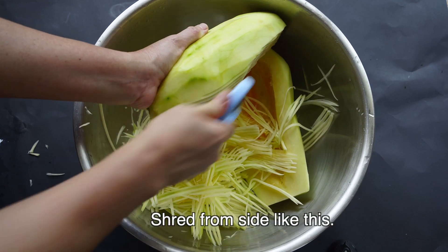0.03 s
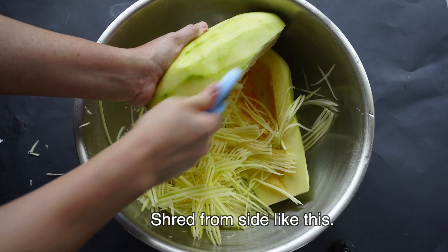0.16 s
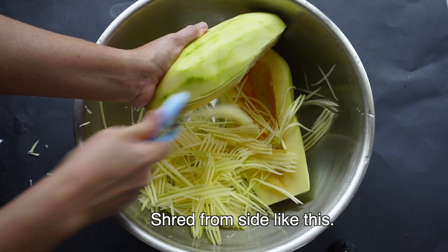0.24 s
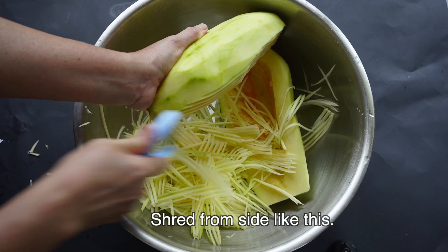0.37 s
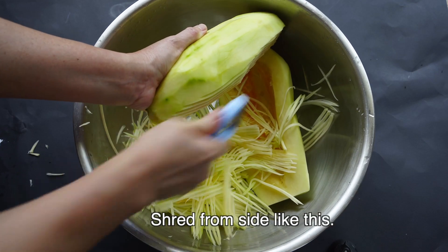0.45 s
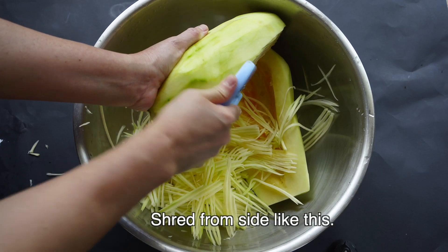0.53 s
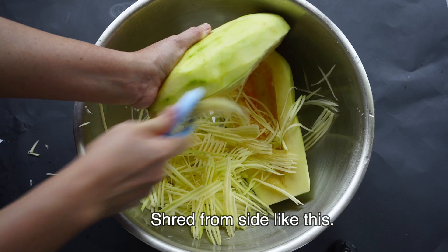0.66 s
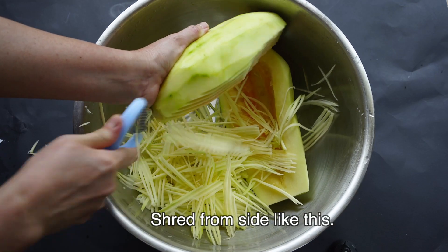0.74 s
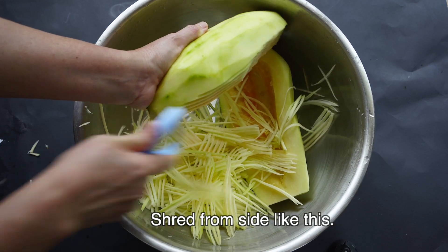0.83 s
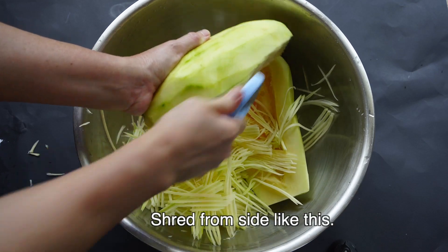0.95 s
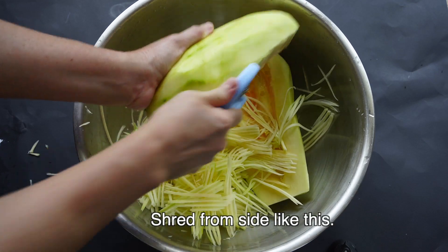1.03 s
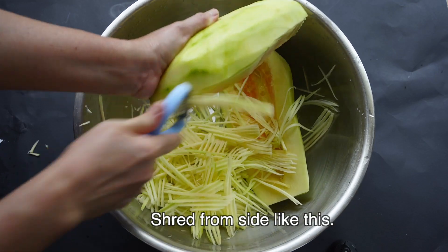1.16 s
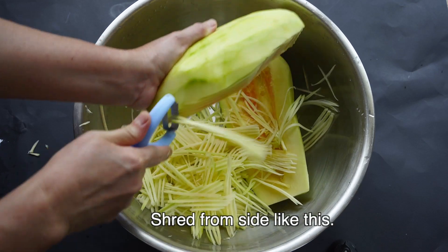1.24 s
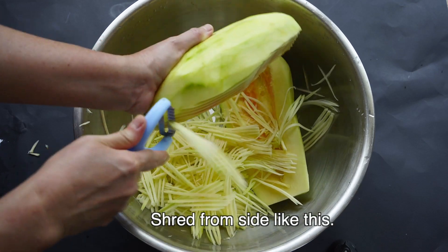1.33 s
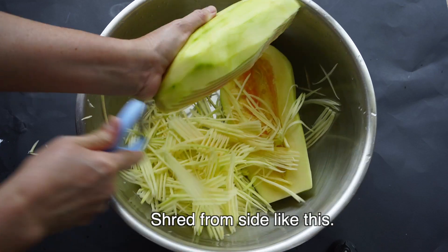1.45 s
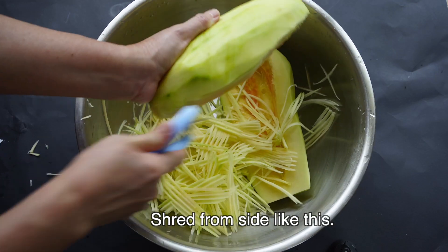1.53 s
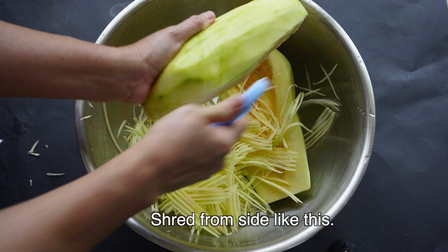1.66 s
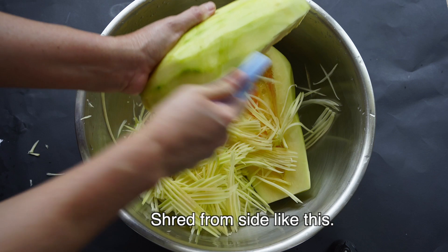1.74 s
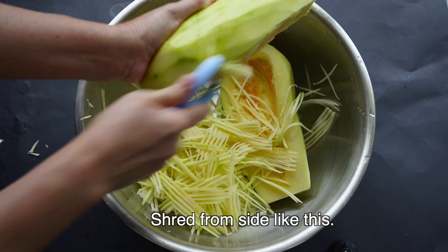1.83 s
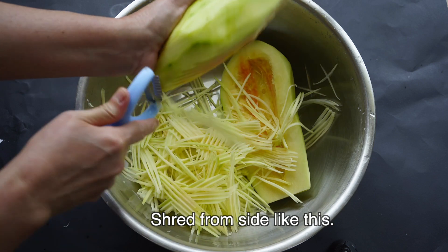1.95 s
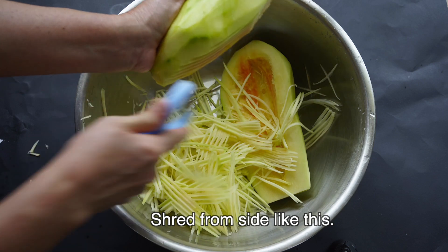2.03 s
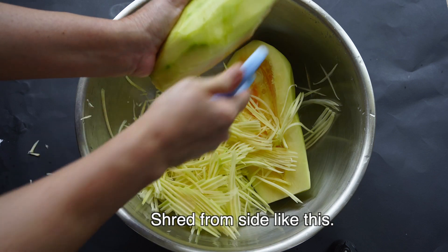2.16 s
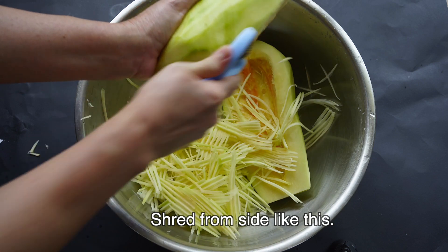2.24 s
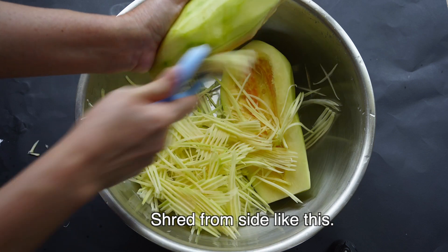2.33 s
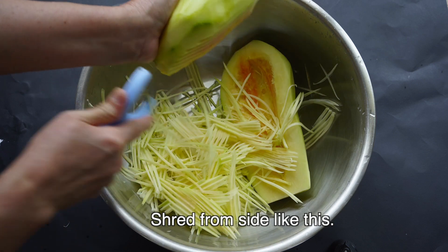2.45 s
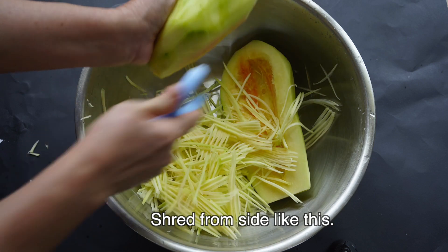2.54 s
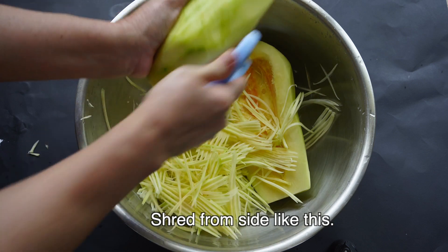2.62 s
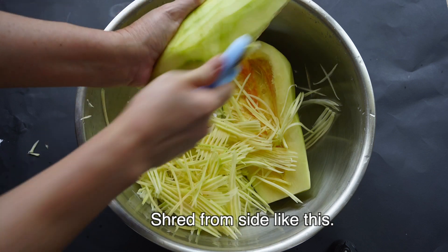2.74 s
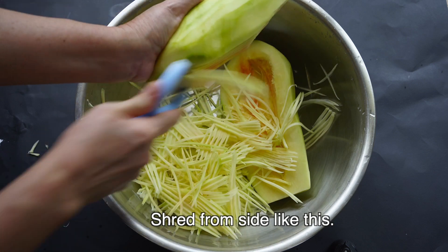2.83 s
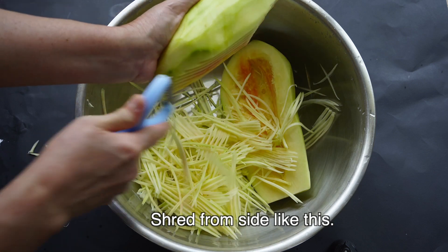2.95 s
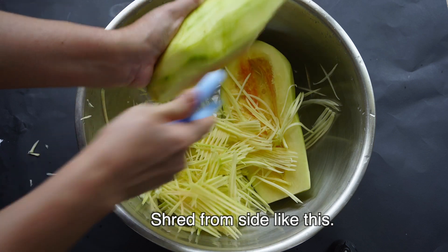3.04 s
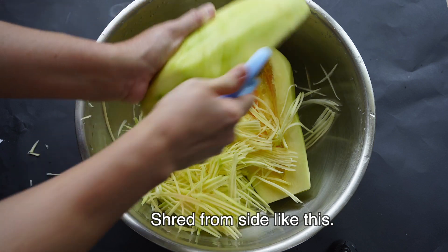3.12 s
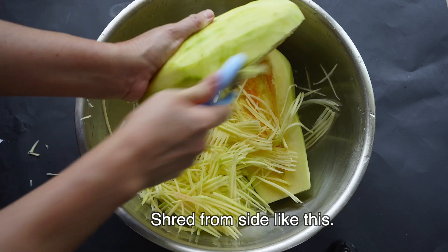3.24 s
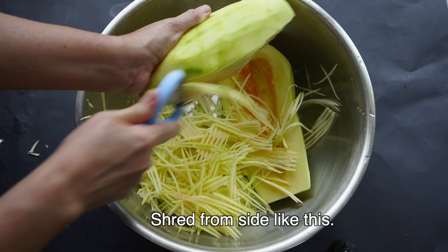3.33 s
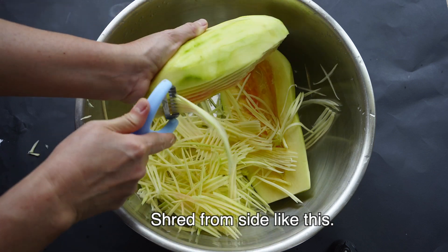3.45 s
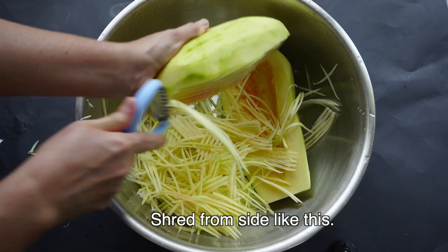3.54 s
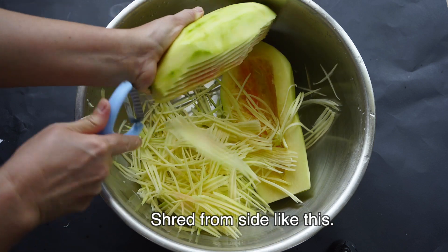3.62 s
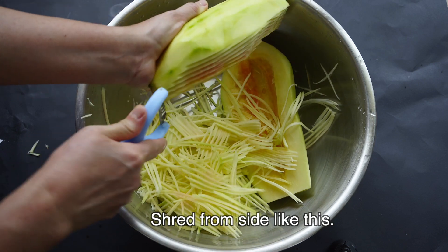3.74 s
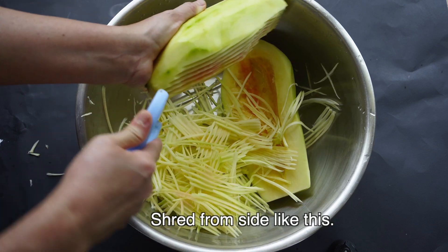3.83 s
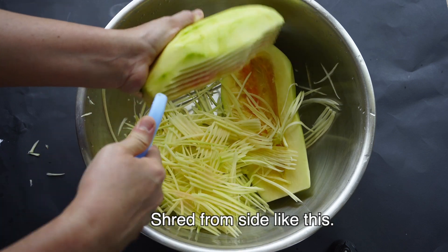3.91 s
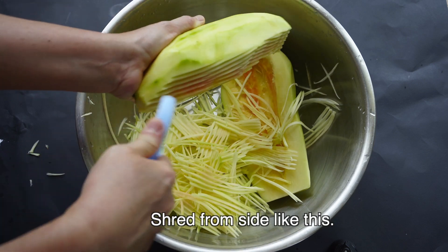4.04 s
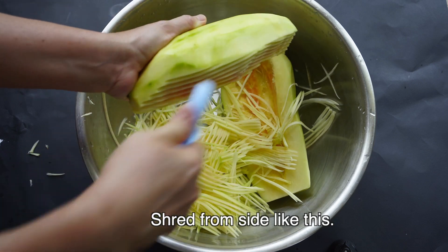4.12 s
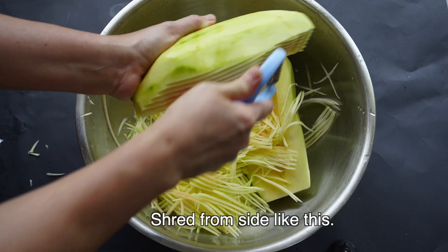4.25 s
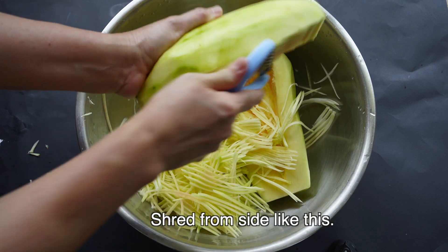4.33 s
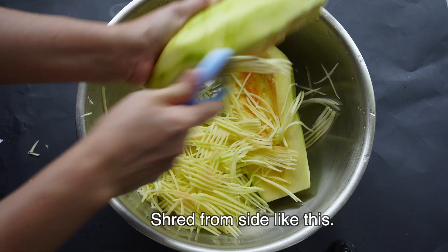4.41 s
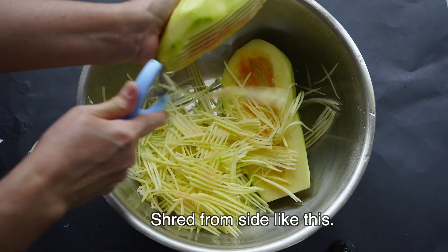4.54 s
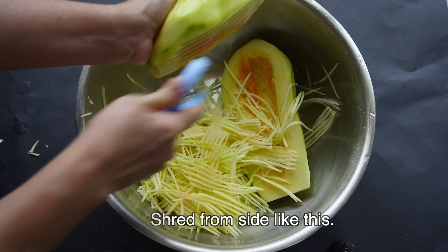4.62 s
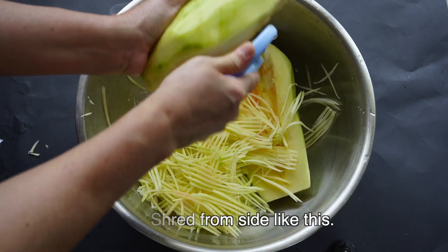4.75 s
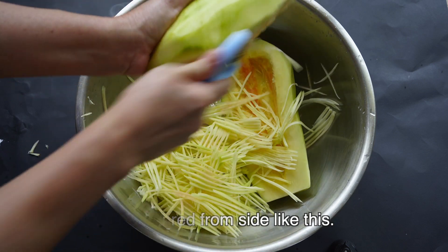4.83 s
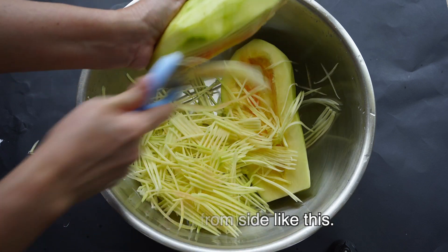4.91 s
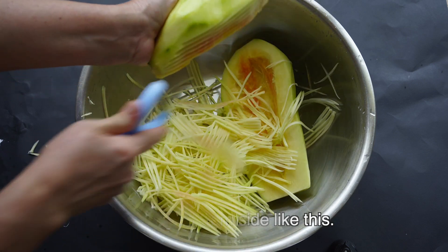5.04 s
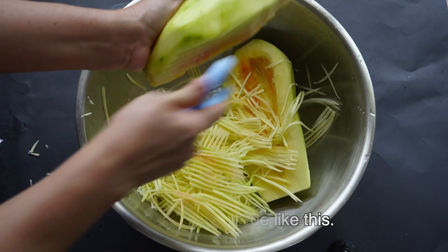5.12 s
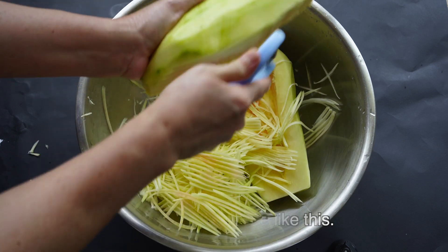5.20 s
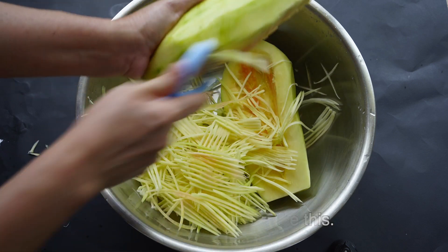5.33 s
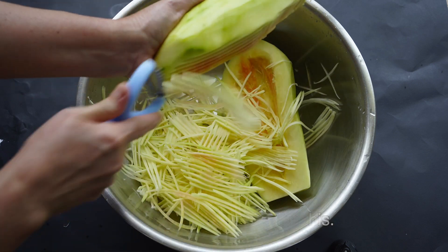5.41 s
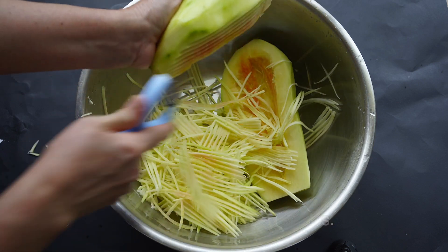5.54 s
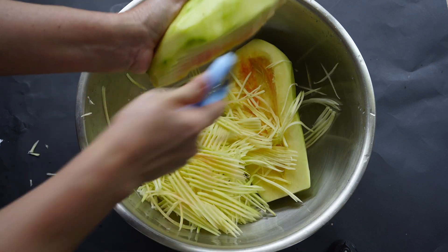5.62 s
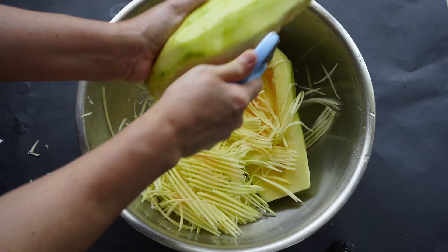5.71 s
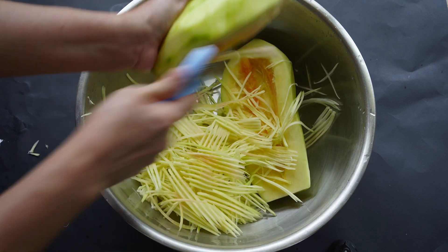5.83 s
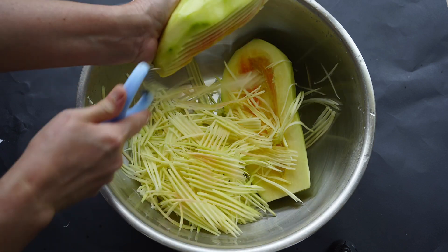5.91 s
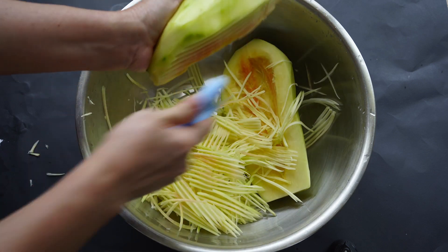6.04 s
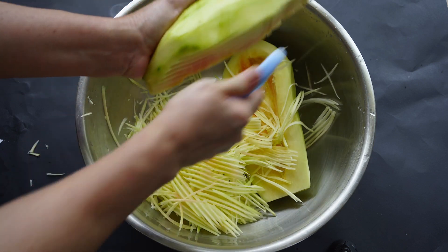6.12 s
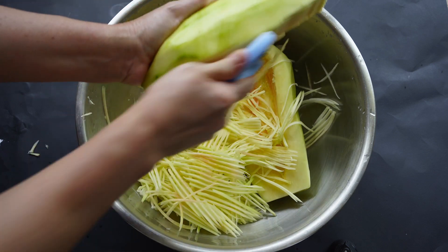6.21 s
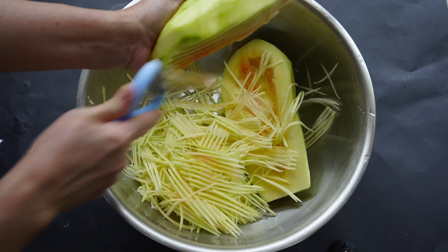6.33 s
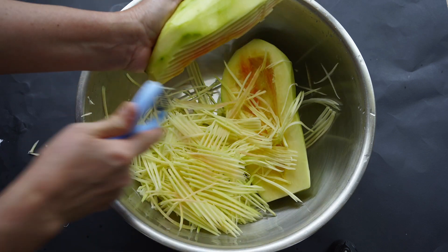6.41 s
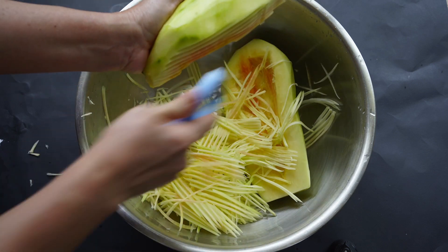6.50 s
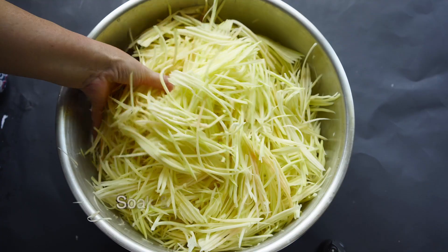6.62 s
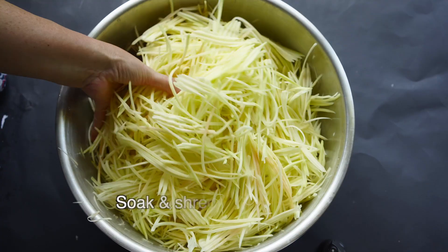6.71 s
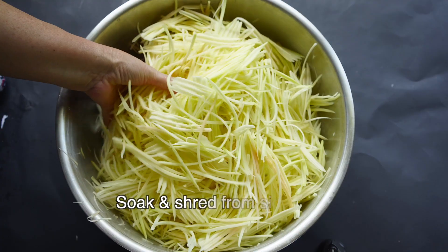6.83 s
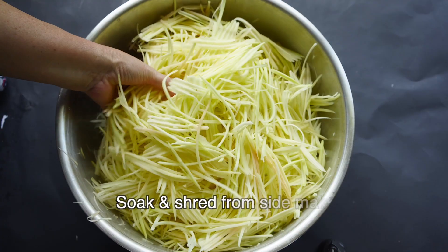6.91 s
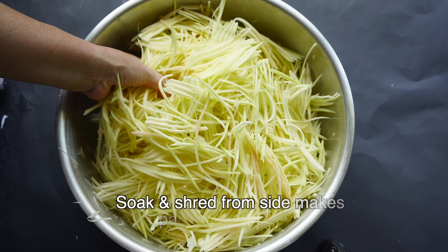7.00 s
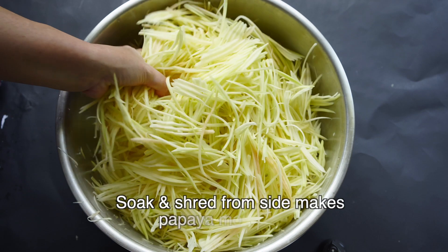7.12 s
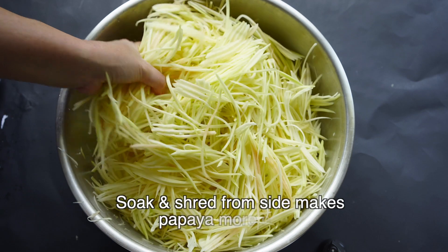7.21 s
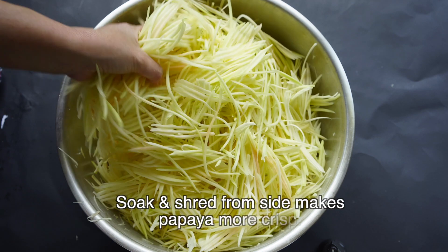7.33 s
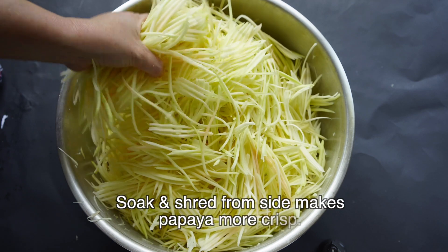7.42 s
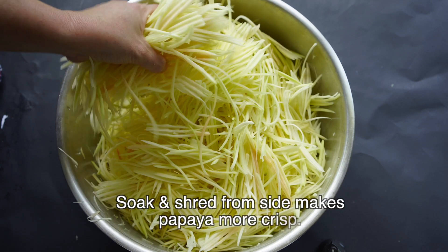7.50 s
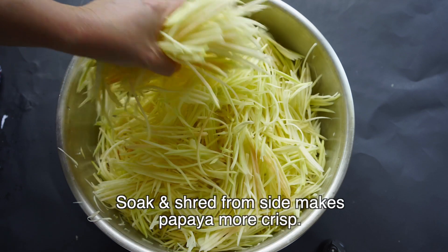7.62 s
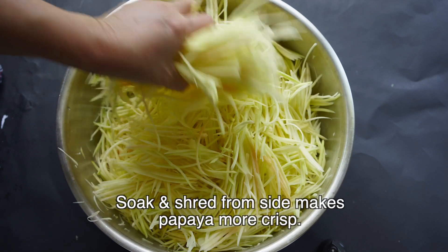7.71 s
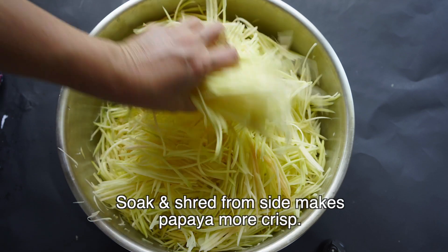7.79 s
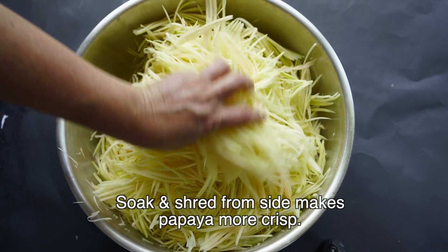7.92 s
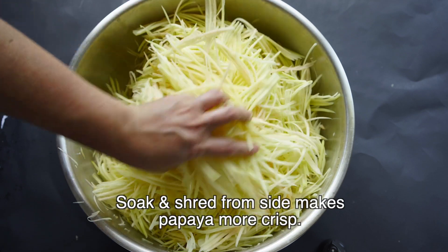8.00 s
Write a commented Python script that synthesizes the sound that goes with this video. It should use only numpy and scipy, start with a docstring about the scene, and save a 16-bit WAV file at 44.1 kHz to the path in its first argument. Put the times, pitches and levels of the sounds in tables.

```python
"""A hand shredder is pulled again and again down a firm green fruit over a steel bowl in a quiet kitchen.
Each stroke opens with a sharp bite of the teeth, then rasps: bursting cells click densely and ring the
blade frame. Between strokes the tool brushes, the loose blade ticks and the fruit bumps the bowl.
At the end a hand turns the wet shreds over and nails clink on the steel. The room hums softly."""
import sys
import numpy as np
from scipy import signal
from scipy.fft import rfft, irfft
from scipy.io import wavfile

SR = 44100
rng = np.random.default_rng(int(sys.argv[2]) if len(sys.argv) > 2 else 0)


def store_pcm(level_fs):
    """Save levels as 16-bit WAV."""
    pcm = np.round(np.clip(level_fs, -1, 1) * 32767).astype(np.int16)
    wavfile.write(sys.argv[1], SR, np.atleast_2d(pcm).T)


N = 355446


def from_db(db):
    """Decibels to gain."""
    return 10 ** (np.asarray(db) / 20)


def unit_rms(x):
    """Scale to rms 1."""
    return x / np.sqrt(np.mean(x ** 2) + 1e-20)


def drift(rate_hz):
    """Slow random wander, rms 1."""
    r = np.exp(-2 * np.pi * rate_hz / SR)
    return unit_rms(signal.lfilter([1], [1, -2 * r, r * r], rng.standard_normal(N)))


def clicks(per_s, spread_db):
    """Two streams of random clicks of uneven size, rms 1."""
    sizes = from_db(spread_db * np.minimum(rng.exponential(1, (2, N)), 5))
    signs = rng.choice([-1, 1], (2, N))
    return unit_rms(sizes * signs * (rng.random((2, N)) < per_s / SR))


def resonate(x, hz, width_hz):
    """One resonance, peak gain 1."""
    r, w = np.exp(-np.pi * width_hz / SR), 2 * np.pi * hz / SR
    return signal.lfilter([(1 - r * r) / 2, 0, (r * r - 1) / 2], [1, -2 * r * np.cos(w), r * r], x)


def ring(force, hz, t60_s):
    """One mode driven by a short force, peak 1."""
    r, w = from_db(-60 / (t60_s * SR)), 2 * np.pi * hz / SR
    sound = signal.lfilter([1, 0, -1], [1, -2 * r * np.cos(w), r * r], force + 1e-18)
    return sound / np.abs(sound).max()


def struck(starts_s, levels_db, contacts_s, modes):
    """Short rough contacts ring each mode (Hz, dB, T60 s) with a slightly random strength."""
    length = SR // 2
    decay = np.exp(-np.arange(length) / SR / np.clip(contacts_s, .0003, .03)[:, None])
    forces = rng.standard_normal((len(starts_s), length)) * decay
    scatter_db = 0.8 * rng.standard_normal((len(starts_s), len(modes)))
    out = np.zeros(N + length)
    for start_s, db, force, offsets_db in zip(starts_s, levels_db, forces, scatter_db):
        blow = out[round(start_s * SR):][:length]
        for (hz, mode_db, t60_s), offset_db in zip(modes, offsets_db):
            blow += from_db(db + mode_db + offset_db) * ring(force, hz, t60_s)
    return out[:N]


def bursts(starts_s, levels_db, t60_s, rise_s):
    """Burst envelope: quick rise, exponential fall."""
    out = np.zeros(N)
    for start_s, db in zip(starts_s, levels_db):
        start = round(start_s * SR)
        t = np.arange(min(int(2 * t60_s * SR), N - start)) / SR
        out[start:start + len(t)] += from_db(db - 60 * t / t60_s) * (1 - np.exp(-t / rise_s))
    return out


# Stereo image. Each row: frequency in Hz, left-right correlation.
CORRELATION = [(300, 1), (600, 0.84), (1200, 0.69), (2500, 0.5), (5000, 0.6), (12000, 0.32)]

def coloured(pair, spectrum):
    """Two unrelated signals become left and right with the given spectral shape, rms 1."""
    log_hz = np.log(np.maximum(np.fft.rfftfreq(N, 1 / SR), 10))

    def curve(rows):
        hz, values = np.transpose(rows)
        return np.interp(log_hz, np.log(hz), values)

    alike = np.clip(curve(CORRELATION), 0, 1)
    mid, side = rfft(pair) * from_db(curve(spectrum)) * np.sqrt([1 + alike, 1 - alike])
    return unit_rms(irfft(np.array([mid + side, mid - side]), N))


# Room air. Each row: frequency in Hz, relative density in dB.
AIR_SPECTRUM = [(18, -118), (30, -53), (108, -17.5), (220, -12.5), (258, 0), (286, -9.5), (424, -11),
                (551, -10), (628, -10), (775, -10), (907, -12), (2330, -20), (2870, -24.5), (15800, -31.5)]
# Room hum. Each row: centre in Hz, width in Hz, level in dB.
HUM_BANDS = [(250, 15, -73), (403, 90, -64.5), (610.3, 31, -65.5)]

def room_tone(air_db=-51):
    """Steady air noise and narrow noise bands that waver as a hum."""
    air = from_db(air_db) * coloured(rng.standard_normal((2, N)), AIR_SPECTRUM)
    white = rng.standard_normal(N)
    hum = sum(from_db(db) * unit_rms(resonate(resonate(white, hz, width_hz), hz, width_hz))
              for hz, width_hz, db in HUM_BANDS)
    return air + hum


def kitchen_echoes(x, t60_s=0.36, split_hz=600):
    """Dense echoes: shared in the bass, separate per side above, dying faster in the treble."""
    t = np.arange(int(.6 * SR)) / SR
    noise = rng.standard_normal((3, len(t))) * (t > .004)
    bass = signal.sosfilt(signal.butter(2, split_hz, fs=SR, output="sos"), noise[2])
    upper = signal.sosfilt(signal.butter(2, split_hz, "high", fs=SR, output="sos"), noise[:2])
    mids = signal.lfilter([.45], [1, -.55], upper)
    tail = (bass + mids) * from_db(-60 * t / t60_s)
    tail += (upper - mids) * from_db(-60 * t / (0.47 * t60_s))
    tail /= np.sqrt(np.sum(tail ** 2, axis=1, keepdims=True))
    return signal.fftconvolve(x, tail, axes=1)[:, :N]


# Hand turning the shreds. Each row: time in seconds, level in dB.
RUSTLE_ENVELOPE = [(6.55, -63), (6.584, -83), (6.61, -47.5), (6.626, -71), (6.712, -50), (6.838, -77),
                   (7.094, -51), (7.14, -62), (7.3, -66)]

def shred_rustle():
    """Wet shreds crackle sparsely under the hand."""
    times_s, db = np.transpose(RUSTLE_ENVELOPE)
    gain = np.interp(np.arange(N) / SR, times_s, from_db(db), left=0, right=0)
    spectrum_hz_db = [(1200, -11), (2500, -6), (5000, -3.5), (10000, -9.5), (15000, -14)]
    return gain * coloured(clicks(2500, spread_db=3.5), spectrum_hz_db)


# Fruit on bowl. Each row: start in seconds, level in dB, contact in seconds, steel ring offset in dB.
FRUIT_BUMPS = [(.719, -48, 0.011, -40), (1.209, -32, 0.022, -40), (1.289, -37.5, .013, -40),
               (1.493, -18.5, 0.017, -9.5), (1.575, -11, 0.0014, -23), (1.599, -25.5, 0.0029, -30),
               (3.692, -33.5, 0.035, -40), (3.821, -32.5, 0.022, -40), (3.843, -37.5, 0.0068, -40)]
# Modes of fruit and pile, and of the empty bowl. Each row: frequency in Hz, level in dB, T60 in seconds.
THUD_MODES = [(153, -9, 0.068), (207, -1, 0.056), (308, -3, 0.037), (438, 2.5, 0.031), (627, -3, 0.029),
              (860, -3, 0.025), (1304, -7.5, 0.018), (2090, -13, 0.023), (3430, -6, 0.009),
              (4550, -22, 0.012)]
EMPTY_BOWL_MODES = [(1653, -6, .4), (1701, 0, .42)]

def bowl_bumps():
    """Each bump thuds in fruit and pile and rings the steel."""
    start_s, db, contact_s, steel_db = np.transpose(FRUIT_BUMPS)
    thud = struck(start_s, db - 5.5, contact_s, THUD_MODES)
    steel = struck(start_s, db + steel_db, contact_s, EMPTY_BOWL_MODES)
    return thud + steel


# Nails on bowl. Each row: start in seconds, level in dB, contact in seconds, high ring offset in dB.
NAIL_CLINKS = [(7.639, -46, 0.0072, -8), (7.6515, -44, 0.0055, -10), (7.7516, -58, 0.0061, 23),
               (7.8246, -44, 0.0063, 11)]
# Filled bowl. Each row: frequency in Hz, level in dB, T60 in seconds.
FILLED_BOWL_MODES = [(1820, -5, .1), (1870, -7, .12), (2013, 0, .2), (2336, -2, .11), (2665, -3, .06),
                     (3000, -10, .06), (3510, -11, .05)]

def nail_clinks():
    """Nails ring the filled, damped bowl briefly."""
    start_s, db, contact_s, high_db = np.transpose(NAIL_CLINKS)
    low = struck(start_s, db - 3.5, contact_s, FILLED_BOWL_MODES)
    high = struck(start_s, db + high_db - 14, contact_s, [(4950, 0, .025)])
    return low + high


# Blade and shred ticks. Each row: start in seconds, peak in dB, centre in Hz.
BLADE_TICKS = [(0.0443, -35.5, 4670), (0.222, -23, 2110), (0.365, -24, 2100), (0.5076, -27.5, 2170),
               (0.826, -21.5, 2350), (0.8979, -30.5, 2760), (0.9427, -33, 2150), (0.9635, -35.5, 3670),
               (1.0136, -36, 2710), (1.468, -25, 4700), (1.7308, -38.5, 2710), (1.762, -41.5, 2940),
               (2.1537, -36, 3130), (2.5335, -24, 2570), (2.616, -27.5, 3250), (2.9948, -24.5, 2270),
               (3.091, -31.5, 2550), (3.1904, -40, 2920), (3.6607, -19, 2440), (3.7884, -20, 2920),
               (3.822, -19.5, 3650), (3.8392, -18, 6340), (3.8462, -21, 3450), (4.122, -27.5, 3230),
               (4.177, -37, 3570), (4.243, -34, 3400), (4.256, -35, 3300), (4.2672, -33.5, 3100),
               (4.355, -41, 2960), (4.5932, -20.5, 2940), (4.6023, -22, 2690), (4.8163, -32, 4370),
               (5.091, -26.5, 2600), (5.662, -35, 2100), (5.681, -37.5, 4370), (5.7933, -31, 2950),
               (5.9926, -24, 2770), (6.1387, -36.5, 5030), (6.6072, -37, 2020), (6.7052, -36, 4000),
               (6.766, -37, 2090), (6.99, -42, 8000), (7.0293, -34.5, 2980), (7.08, -38, 2500)]

def blade_ticks(t60_s=0.049, rise_s=0.00034):
    """The loose blade and snapping shreds tick: noise puffs through a broad resonance."""
    out, length = np.zeros((2, N)), int(0.036 * SR)
    t = np.arange(length) / SR
    envelope = from_db(-60 * t / t60_s) * (1 - np.exp(-t / rise_s))
    for start_s, peak_db, hz in BLADE_TICKS:
        mid, side = rng.standard_normal((2, length))
        puff = (mid + 0.62 * side * [[1], [-1]]) * envelope
        tick = resonate(puff, hz, 0.55 * hz) + 0.019 * np.diff(puff, prepend=0)
        start = round(start_s * SR)
        out[:, start:start + length] += from_db(peak_db) * tick / np.abs(tick).max()
    return out


# Teeth entering the flesh. Each row: start in seconds, level in dB, knock offset in dB,
# snap frequency in Hz, snap offset in dB.
TOOTH_BITES = [(0.1908, -13, -41, 2600, -3.5), (0.4561, -15.5, -27.5, 2330, -21),
               (0.6251, -9, -15.5, 2700, -8), (1.0716, -15, -40, 2910, -1), (1.0802, -8.5, -31, 2840, -10),
               (1.4976, -7, -33, 1830, -24), (1.851, -5.5, -47, 1440, -9), (2.3128, -10, -17, 1410, -5),
               (2.7567, -11.5, -47, 3240, -8.5), (3.2117, -11.5, -39, 2900, -9.5),
               (3.22, -9.5, -31, 2900, -8.5), (3.7724, -16.5, -25, 2410, -10),
               (4.3815, -6.5, -32, 3100, -9), (4.8685, -7.5, -20, 1400, -15),
               (5.3369, -6, -29, 1333, -13.5), (5.8151, -19.5, -19.5, 2980, -3.5),
               (6.2725, -7, -23.5, 2930, -9)]
# Crack of a bite. Each row: frequency in Hz, relative density in dB.
CRACK_SPECTRUM = [(410, -35), (700, -16), (1260, -6), (2090, -0.5), (3060, -0.5), (4120, -3), (5490, -1),
                  (13000, -11.5), (15800, -19)]

def tooth_bites(contact_s=0.0027, right_bias_db=0.7):
    """The row of teeth lands within a few ms: a crack, a woody snap and a dull knock in the fruit."""
    start_s, db, knock_db, snap_hz, snap_db = np.transpose(TOOTH_BITES)
    crack = coloured(clicks(9000, spread_db=2), CRACK_SPECTRUM)
    crack *= bursts(start_s, db - 5, t60_s=0.036, rise_s=0.0013)
    knock = struck(start_s, db + knock_db, np.full(len(start_s), contact_s), [(465, 0, .04)])
    snap = sum(struck([at_s], [level_db], [contact_s], [(hz, 0, .016)])
               for at_s, level_db, hz in zip(start_s, db + snap_db, snap_hz))
    pan = from_db([[-right_bias_db / 2], [right_bias_db / 2]])
    return (crack + snap) * pan + knock


# Light blade contacts. Each row: start in seconds, length in seconds, tearing level in dB,
# frame ring offset in dB, ring centre in Hz, sheen offset in dB, fade in dB per second.
BLADE_BRUSHES = [(0.458, 0.013, -41, 1.5, 2120, -19, 205), (1.439, .035, -36.5, -3, 2320, 3, 498),
                 (1.513, 0.047, -37, 3, 1750, -11, 206), (2.145, 0.016, -49.5, 6.5, 1670, -6, 320),
                 (3.611, 0.053, -32.5, -3.5, 2330, 1, 500), (3.692, 0.014, -38, -1, 2300, -13, 300),
                 (3.781, 0.067, -43.5, 1, 2300, 2, 230), (4.104, 0.014, -48.5, -3, 2190, -11, 478),
                 (4.235, 0.035, -59, 3, 2150, -18, 520)]

def brush_shapes(touch_s=0.011, spread_oct=0.28, floor_db=-58.5):
    """Rasp breakpoints per brush: the blade lands softly, holds one colour and fades."""
    for start_s, length_s, db, ring_db, hz, sheen_db, fade_db_per_s in BLADE_BRUSHES:
        colour = ring_db, hz, spread_oct, sheen_db
        end_s = start_s + length_s
        yield [(start_s - touch_s, floor_db, *colour),
               (start_s, db, *colour),
               (end_s, db, *colour),
               (end_s + (db - floor_db) / fade_db_per_s, floor_db, *colour)]


TOUCH_S, OFF_DB = 0.0055, -100
# Pulls down the fruit. Each row: start in seconds, length in seconds, fastest point as share of length,
# tearing level in dB, entry offset in dB, frame ring offset in dB, ring centre in Hz,
# ring spread in octaves, entry sheen offset in dB, fade in dB per second.
SHREDDER_STROKES = [(0.201, .16, 0.48, -29.5, -6.5, 4, 1840, .3, -18, 420),
                    (0.636, .15, 0.56, -28.5, -4, 2.5, 1980, 0.3, -11, 294),
                    (1.097, 0.18, 0.67, -30, -5, 5, 2110, .25, -14, 420),
                    (1.868, 0.14, 0.58, -30.5, 0.5, 5, 1930, .3, -2, 324),
                    (2.328, .14, 0.82, -28.5, -2, 4, 2000, .35, -11, 285),
                    (2.782, 0.17, 0.78, -28.5, -13, 1, 1830, 0.48, -14, 255),
                    (3.268, .18, 0.86, -29.5, -13, 2, 1980, 0.37, -8, 552),
                    (4.395, 0.18, 0.69, -29.5, -2.5, -1, 1600, 0.53, -4, 480),
                    (4.883, 0.13, .48, -28.5, -6.5, 0.5, 1780, 0.54, 1, 340),
                    (5.353, 0.14, 0.65, -29, -6, -2, 1740, 0.47, -4, 480),
                    (5.831, .145, 0.39, -31, -4, 2, 1720, 0.35, -3, 520),
                    (6.287, .14, 0.55, -30.5, -1, 1, 1930, 0.71, 4, 380)]

def stroke_shapes(dig_s=0.037, fast_sheen_db=4.5, fade_db=44):
    """Rasp breakpoints per stroke: touch, entry, dug in, full speed, tip, lift. Sheen follows speed."""
    for (start_s, length_s, fastest, db, entry_db, ring_db, hz, spread_oct, sheen_db,
         fade_db_per_s) in SHREDDER_STROKES:
        speed = min(dig_s / (fastest * length_s), 1)  # share of full speed once dug in
        dug_sheen_db = sheen_db + speed ** .5 * (fast_sheen_db - sheen_db)
        tip_s, tip_db = start_s + length_s, db - 3
        yield [(start_s - TOUCH_S, OFF_DB, ring_db, hz, spread_oct, sheen_db),
               (start_s, db + entry_db, ring_db - 6, hz * 1.07, spread_oct, sheen_db),
               (start_s + dig_s, db - 1.17, ring_db - 6 * (1 - speed), hz, spread_oct, dug_sheen_db),
               (start_s + fastest * length_s, db, ring_db, hz, spread_oct, fast_sheen_db),
               (tip_s, tip_db, ring_db - 5.5, hz * 1.17, spread_oct, 3),
               (tip_s + fade_db / fade_db_per_s, tip_db - fade_db, ring_db - 32, hz * 1.7, spread_oct, -22)]


def contact_curves():
    """Strokes and brushes joined into per-sample rasp controls, silent between contacts."""
    rows = []
    for shape in sorted([*stroke_shapes(), *brush_shapes()]):
        first, last = shape[0], shape[-1]
        rows += [(first[0] - TOUCH_S, OFF_DB, *first[2:]), *shape, (last[0] + TOUCH_S, OFF_DB, *last[2:])]
    times_s, *columns = np.transpose(rows)
    times_s = np.minimum.accumulate(times_s[::-1])[::-1]  # a new contact cuts the last fade short
    return [np.interp(np.arange(N) / SR, times_s, column) for column in columns]


# Tearing flesh and its high sheen. Each row: frequency in Hz, relative density in dB.
TEARING_SPECTRUM = [(450, -34), (1000, -22), (1300, -8.5), (3000, 6.5), (4200, 1.5), (5100, -5.5),
                    (7100, 1), (9000, -4.5)]
SHEEN_SPECTRUM = [(7000, -11), (9500, 4), (11200, 0), (13000, 4.5), (15500, 3)]
# Modes of the blade frame and of single teeth. Each row: frequency in Hz, width in Hz, level in dB.
FRAME_MODES = [(1250, 170, -5), (1420, 150, -1), (1720, 170, -3), (1960, 160, 0), (2110, 140, 0),
               (2380, 190, -5), (2650, 190, -4), (2980, 220, -1)]
TOOTH_MODES = [(3450, 200, -25.5), (5240, 590, -9.5), (5820, 690, -15.5), (6520, 140, -20.5),
               (8020, 1100, -17)]

def shredder_rasp():
    """Bursting cells click densely; they hiss directly and ring the frame near a moving centre."""
    tear_db, ring_db, centre_hz, spread_oct, sheen_db = contact_curves()
    cells = clicks(9000, spread_db=1) * from_db(1.08 * drift(34))  # fibres give way in clumps
    sheen = from_db(sheen_db + 1.26 * drift(29)) * coloured(clicks(7000, spread_db=1.5), SHEEN_SPECTRUM)
    hiss = coloured(cells, TEARING_SPECTRUM) + sheen
    drive = coloured(cells, [(1000, 0), (4000, 0)])  # flat spectrum
    frame = teeth = 0
    for hz, width_hz, db in FRAME_MODES:  # the grip shifts, so each mode swells and fades by itself
        off_centre_db = np.minimum(6 * (np.log2(hz / centre_hz) / spread_oct) ** 2, 9)
        mode = unit_rms(resonate(resonate(drive, hz, width_hz), hz, 2 * width_hz))
        frame += from_db(db - off_centre_db + 2.2 * drift(12)) * mode
    for hz, width_hz, db in TOOTH_MODES:  # teeth sing briefly as they load up
        teeth += from_db(db + 3 * drift(14)) * unit_rms(resonate(drive, hz, width_hz))
    return from_db(tear_db) * (hiss + teeth + from_db(ring_db - 3.5) * frame)


def scene(low_cut_hz=159, echo_db=-9):
    """Near sounds with the deep bass cut away, plus their echoes and the room tone."""
    near = shredder_rasp() + tooth_bites() + blade_ticks() + bowl_bumps() + nail_clinks() + shred_rustle()
    near = signal.sosfilt(signal.butter(4, low_cut_hz, "high", fs=SR, output="sos"), near)
    return near + from_db(echo_db) * kitchen_echoes(near) + room_tone()


def record(dry):
    """Steep low-pass at 15.8 kHz."""
    return signal.sosfilt(signal.ellip(12, .5, 70, 15800, fs=SR, output="sos"), dry)


dry = scene()
out = record(dry)
store_pcm(out)
```